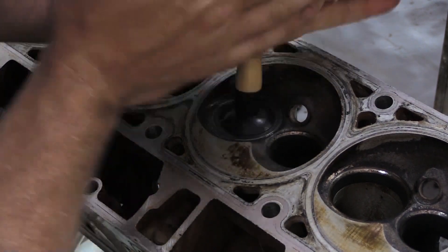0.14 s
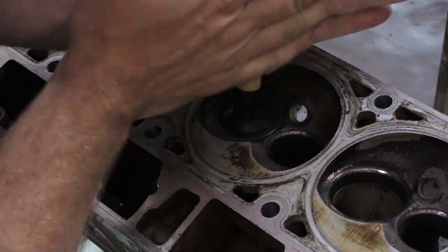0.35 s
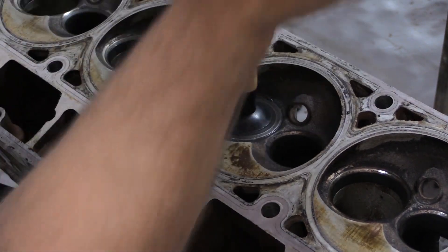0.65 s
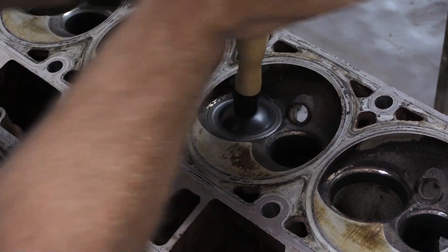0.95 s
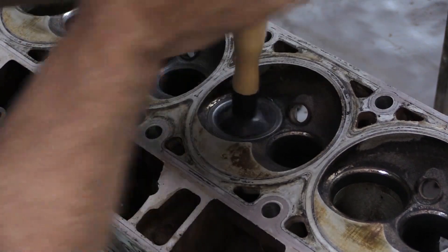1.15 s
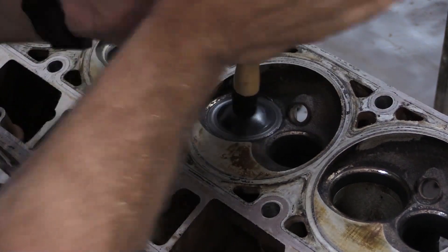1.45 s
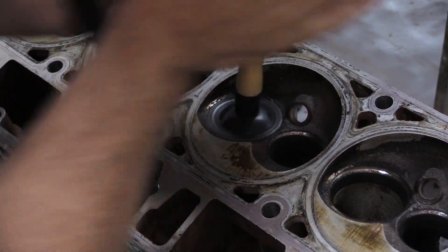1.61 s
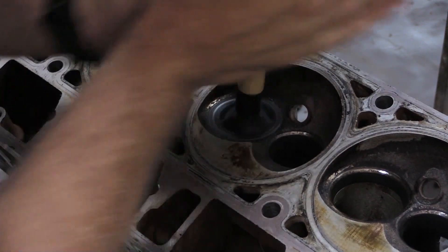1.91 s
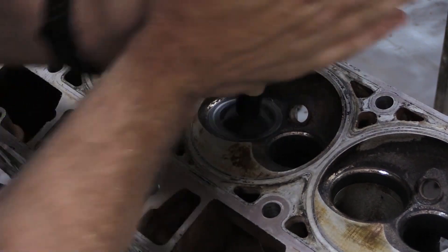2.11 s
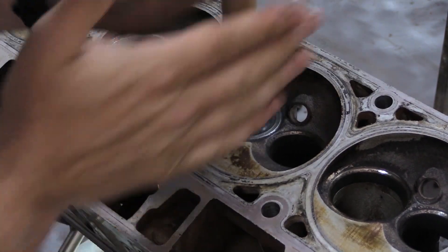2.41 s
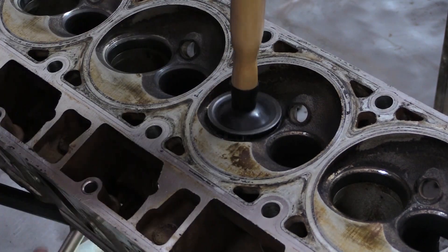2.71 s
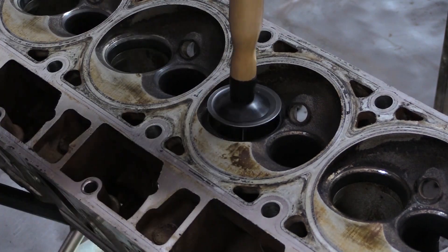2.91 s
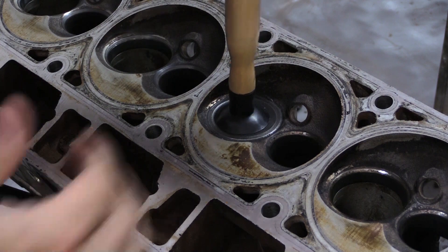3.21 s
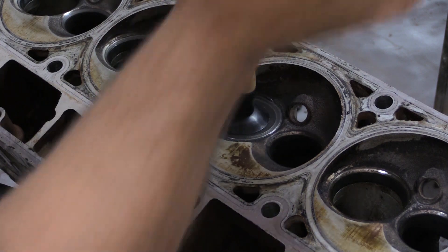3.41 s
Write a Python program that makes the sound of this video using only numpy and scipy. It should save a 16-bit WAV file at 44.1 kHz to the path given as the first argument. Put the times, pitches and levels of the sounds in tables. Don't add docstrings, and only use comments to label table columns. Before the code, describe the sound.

Gritty valve grinding in quick hand-twirled strokes, hissing and ringing with rough judders; a rubber pop near the start and a softer one midway, then a pause and the valve clanks onto its seat. Bare garage, close microphone.

```python
import sys
import numpy as np
from scipy import signal
from scipy.fft import rfft, irfft
from scipy.io import wavfile
from scipy.ndimage import uniform_filter1d

SR = 44100
rng = np.random.default_rng(int(sys.argv[2]) if len(sys.argv) > 2 else 0)


def decibels_to_gain(level_db):
    exponent = np.asarray(level_db, float) / 20
    return 10 ** exponent


def output_pcm(signal):
    pcm = np.clip(np.atleast_2d(signal).T, -1, 1) * 32767
    wavfile.write(sys.argv[1], SR, np.round(pcm).astype(np.int16))


N = 156555
LEAD = SR // 4

# start t/s, length t/s, grit level/dB, rocking re grit level/dB,
# judder re grit level/dB
HALF_TURNS = [(-.17, 0.037, -31, -6, -12), (-.06, 0.13, -28.5, -18, -6), (0.026, 0.32, -34, -17, -7.5),
              (0.16, 0.14, -23.5, 0, 1), (0.258, 0.086, -27, 6.5, 2.5), (0.357, 0.13, -27.5, -4, 5.5),
              (0.452, 0.083, -40.5, 15, -26), (0.845, 0.18, -24, 10.5, 3), (0.99, 0.24, -23.5, 6.5, 0.5),
              (1.109, 0.25, -22.5, -1.5, -2), (1.233, 0.14, -24, -26, -2), (1.345, 0.22, -25.5, -7, -0.5),
              (1.453, 0.14, -25, -17, -6), (1.567, 0.27, -26.5, -18.5, -6), (1.675, 0.037, -29, -26, -6),
              (1.779, 0.16, -30.5, -16.5, -17), (1.877, 0.17, -32, -54, -17), (2.019, 0.18, -26, 6.5, -7),
              (2.093, 0.21, -25, 3, -3), (2.209, 0.17, -27.5, 2, -0.5), (2.326, 0.092, -33.5, 6.5, 8.5)]
# start t/s, length t/s, level/dB
BRUSHES = [
    (0.783, .015, -58.5),
    (0.791, 0.017, -63),
    (2.707, 0.048, -64),
    (2.763, 0.18, -63),
    (3.456, 0.078, -56),
    (3.532, 0.017, -56),
]
# f/Hz, density level/dB
GRIT_SPECTRUM = [(180, -62), (300, -42.5), (1210, -9), (1450, -8), (2090, -18.5), (2550, -21),
                 (3380, -13.5), (10600, -6), (15800, -23)]
# f/Hz, width f/Hz, level/dB
HEAD_MODES = [(1447.2, 17.8, -1.5), (1722, 18, -10.5), (1879, 46, -18.5), (2600.5, 26.5, -10),
              (3029, 5.3, -6.5), (3065, 7.6, -14), (3158, 8.4, -10.5), (4014, 34, -15), (4333, 80, -22.5),
              (5210, 66, -15.5), (5688, 15, -5.5)]
# f/Hz, width f/Hz, level/dB
VALVE_MODES = [(6580, 28, -5), (6800, 34, -1), (7130, 96, -7), (7830, 96, -6), (8660, 34, -3),
               (9140, 32, -2), (9540, 44, 0), (9820, 29, -5), (10200, 23, -4), (10400, 60, -3),
               (11000, 120, -7), (11300, 37, -6), (11600, 140, -7), (12200, 45, -7)]
# f/Hz, width f/Hz, level/dB
CASTING_MODES = [(576, 3, -6), (1456, 1.8, 0), (2585, 4, -7), (3187, 3, -3), (4290, 3, -14)]
# f/Hz, width f/Hz, level/dB
ROCK_MODES = [(576, 24, 0), (630, 50, -9), (710, 60, -13), (530, 50, -14)]
# f/Hz, width f/Hz, level/dB
JUDDER_MODES = [(703, 64, -2), (834, 61, -1), (1070, 330, -4), (1363, 93, -10), (1470, 30, 2.5),
                (1800, 155, -0.5), (1997, 57, -3), (2457, 590, -7)]
# t/s, peak level/dB, f/Hz
POPS = [
    (0.1204, -6, 1800),
    (1.9693, -11, 1960),
]
# multiple of pop f/Hz, level/dB, t60 t/s
CUP_MODES = [(1, 4.5, 0.012), (.7, -18, 0.026), (1.45, -9.5, 0.017)]
# t/s, level/dB, brightness level/dB
TAPS = [
    (.805, -30, -26.5),
    (.841, -18.5, -27),
    (1.0, -28, -13),
    (2.711, -45, -27),
    (3.1105, -11, -12.5),
]
# f/Hz, level/dB, t60 t/s
SEAT_MODES = [(576, 0, .3), (603, -9, .3), (1448, -15, .25), (1712, -12, .2), (2589, -12, .3),
              (3042, -12, .3), (4250, -14, .2), (5690, -1, .17), (6800, -14, .07), (7138, -19, .2),
              (9534, -8, .2), (9787, -14, .2), (10800, -10, .17), (12200, -13, .12)]
# f/Hz, density level/dB
CRACK_SPECTRUM = [(400, -32.5), (900, 5), (2200, -5.5), (4500, 0.5), (7500, -13.5), (11000, 1),
                  (15000, -20)]
# t/s, level/dB, f/Hz
THUDS = [
    (0.572, -49, 90),
    (2.479, -40.5, 106),
    (2.629, -38.5, 50.9),
    (3.114, -38.5, 71.5),
]
# f/Hz, t60 t/s
ROOM_T60 = [(100, 1), (600, 0.89), (1500, 1.0), (4000, 1), (9000, 0.66), (15000, 0.22)]
# f/Hz, level/dB
ROOM_COLOUR = [(300, 0), (1500, -2.5), (4000, 1), (8000, -8.5), (14000, 13)]
# f/Hz, density level/dB
AIR_SPECTRUM = [(12, -38), (20, -8), (233, -5), (819, -17), (1430, -11), (1560, -19), (15800, -27)]

SPEED_SKEW, SPEED_POWER = 0.85, 0.75
JUDDER_SKEW, JUDDER_POWER = 0.42, 0.69
TREBLE_POWER, TREBLE_HZ = 1.9, 10500
GRIT_PER_S, GRIT_SPREAD_DB, HISS_DB = 9000, 4.5, 3
SLIPS_PER_S, SLIP_SPREAD_DB = 900, 4
CLUMP_DB, CLUMPS_PER_S = 4, 45
HEAD_DB, VALVE_DB, CASTING_DB, JUDDER_DB = 2.5, -3, -15, -1
CATCH_PER_S = 18
HEAD_CATCH_DB, VALVE_CATCH_DB, JUDDER_CATCH_DB = 4, 3, 5
RUMBLE_DB, RUMBLE_HZ, LUMPS_DB = -51.5, 140.4, 3
THUD_T60_S = 0.36
CHATTER_S, CHATTER_LOSS_DB, CHATTER_SHARE = 0.005, 2, 0.3
CRACK_DB, CRACK_T60_S = 0.5, 0.32
METAL_LOW_HZ = 458
ROOM_DB, ROOM_DELAY_S = -6, 0.0083
AIR_DB, WHINE_DB, WHINE_HZ = -58, -73, 12500
MIC_TOP_HZ = 16700


def rms_one(x):
    return x / np.sqrt(np.mean(x ** 2) + 1e-20)


def clock():
    return (np.arange(N + LEAD) - LEAD) / SR


def at_hz(points, hz):
    p = np.array(points)
    return np.interp(np.log(np.maximum(hz, 1)), np.log(p[:, 0]), p[:, 1])


def colour(x, spectrum):
    hz = np.arange(len(x) // 2 + 1) * SR / len(x)
    return rms_one(irfft(rfft(x) * decibels_to_gain(at_hz(spectrum, hz)), len(x)))


def lowpass(x, order, hz):
    return signal.sosfilt(signal.butter(order, hz, fs=SR, output="sos"), x)


def drift(rate):
    knots = np.clip(rng.standard_normal(400), -2, 2)
    return np.interp((clock() + 1) * rate, np.arange(400), knots)


def resonance(x, hz, width):
    r = np.exp(-np.pi * width / SR)
    b = (1 - r * r) / 2 * np.array([1, 0, -1])
    a = [1, -2 * r * np.cos(2 * np.pi * hz / SR), r * r]
    return signal.lfilter(b, a, x + 1e-18)


def ring(times, gains, hz, t60):
    blows = np.full(N + LEAD, 1e-18)
    blows[(np.asarray(times) * SR).astype(int) + LEAD] = gains
    r = decibels_to_gain(-60 / (t60 * SR))
    w = 2 * np.pi * hz / SR
    return signal.lfilter([0, np.sin(w)], [1, -2 * r * np.cos(w), r * r], blows)


def grains(per_s, spread_db):
    n = N + LEAD
    size = decibels_to_gain(spread_db * np.minimum(rng.exponential(1, n), 3))
    sign = rng.choice([-1, 1], n)
    return rms_one(size * sign * (rng.random(n) < per_s / SR))


def turning(starts, lengths, dbs, power, skew=SPEED_SKEW):
    t = clock()
    gain = np.zeros(len(t))
    for start, length, db in zip(starts, lengths, dbs):
        phase = np.clip((t - start) / length, 0, 1) ** skew
        inside = (t > start) * (t < start + length)
        gain += decibels_to_gain(db) * np.sin(np.pi * phase) ** power * inside
    return gain


def body(drive, modes, catch_db):
    norm = np.sqrt(sum(decibels_to_gain(2 * db) * width for _, width, db in modes) * np.pi / SR)
    out = 0
    for k, (hz, width, db) in enumerate(modes):
        caught = drive * decibels_to_gain(catch_db * drift(CATCH_PER_S))
        out = out + (-1) ** k * decibels_to_gain(db) * resonance(caught, hz, width)
    return out / norm


def grinding():
    start, length, db, rock_db, judder_db = np.transpose(HALF_TURNS)
    gap = np.diff(start, append=9)
    length = np.where(gap < 0.2, gap, length)
    brush = turning(*np.transpose(BRUSHES), SPEED_POWER)
    speed = turning(start, length, db, SPEED_POWER) + brush
    treble_speed = turning(start, length, db, TREBLE_POWER) + brush
    rocking = turning(start, length, db + rock_db, JUDDER_POWER, JUDDER_SKEW)
    juddering = turning(start, length, db + judder_db, JUDDER_POWER, JUDDER_SKEW)

    grit = grains(GRIT_PER_S, GRIT_SPREAD_DB)
    slips = grains(SLIPS_PER_S, SLIP_SPREAD_DB) * decibels_to_gain(CLUMP_DB * drift(CLUMPS_PER_S))
    hiss = decibels_to_gain(HISS_DB) * colour(grit, GRIT_SPECTRUM)
    dull = lowpass(hiss, 1, TREBLE_HZ)

    out = dull * speed + (hiss - dull) * treble_speed
    out += decibels_to_gain(CASTING_DB) * body(grit * speed, CASTING_MODES, 0)
    out += decibels_to_gain(HEAD_DB) * body(grit * speed, HEAD_MODES, HEAD_CATCH_DB)
    out += decibels_to_gain(VALVE_DB) * body(grit * speed, VALVE_MODES, VALVE_CATCH_DB)
    out += body((grit + slips / 2) * rocking, ROCK_MODES, 0)
    out += decibels_to_gain(JUDDER_DB) * body(slips * juddering, JUDDER_MODES, JUDDER_CATCH_DB)
    return out


def bench():
    start, length, *_ = np.transpose(HALF_TURNS)
    starts, lengths = [*start, 0.5, 2.4, 3.1], [*length, 0.35, 0.35, 0.6]
    busy = uniform_filter1d(turning(starts, lengths, np.zeros(len(starts)), 0.17), size=5000)
    rumble = rms_one(lowpass(rng.standard_normal(N + LEAD), 2, RUMBLE_HZ))
    thuds = sum(ring([t], decibels_to_gain(db), hz, THUD_T60_S) for t, db, hz in THUDS)
    return decibels_to_gain(RUMBLE_DB + LUMPS_DB * drift(9.4)) * busy * rumble + lowpass(thuds, 2, 220)


def garage_air():
    air = colour(rng.standard_normal(N + LEAD), AIR_SPECTRUM)
    whine = rms_one(resonance(rng.standard_normal(N + LEAD), WHINE_HZ, 30))
    return decibels_to_gain(AIR_DB) * air + decibels_to_gain(WHINE_DB) * whine


def cup_pops():
    return sum(ring([t], decibels_to_gain(db + mode_db), hz * multiple, t60)
               for t, db, hz in POPS for multiple, mode_db, t60 in CUP_MODES)


def seat_taps():
    t, db, bright = np.repeat(np.transpose(TAPS), 6, axis=1)
    k = np.arange(len(t)) % 6
    t = t + CHATTER_S * k * rng.uniform(0.8, 1.2, len(t))
    db = db - 1 - CHATTER_LOSS_DB * k
    out = 0
    for hz, mode_db, t60 in SEAT_MODES:
        dulling = (bright - bright.max()) * (hz > 2000)
        share = np.where(k, rng.normal(0, CHATTER_SHARE, len(t)), 1)
        out = out + ring(t, decibels_to_gain(db + mode_db + dulling) * share, hz, t60)

    now = clock()
    crack = np.zeros(len(now))
    for hit, hit_db, bright_db in TAPS:
        fall_db = 60 * np.abs(now - hit) / CRACK_T60_S
        crack += decibels_to_gain(hit_db + bright_db + CRACK_DB - fall_db) * (now > hit)
    return out + crack * colour(rng.standard_normal(len(now)), CRACK_SPECTRUM)


def garage(x):
    t = np.arange(SR) / SR
    edges = 100 * 2 ** np.arange(0, 7.6, 0.5)
    onset = np.clip(t / ROOM_DELAY_S - 0.5, 0, 1)
    tail = 0
    for low, high in zip(edges, edges[1:]):
        half_octave = signal.butter(2, [low, high], "band", fs=SR, output="sos")
        band = signal.sosfilt(half_octave, rng.standard_normal(SR))
        fall = decibels_to_gain(-60 * t / at_hz(ROOM_T60, np.sqrt(low * high)))
        tail = tail + decibels_to_gain(at_hz(ROOM_COLOUR, low)) * band * fall * onset
    return signal.fftconvolve(x, tail / np.sqrt(SR * 0.07))[:len(x)]


def scene():
    highpass = signal.butter(4, METAL_LOW_HZ, "high", fs=SR, output="sos")
    close = signal.sosfilt(highpass, grinding() + cup_pops() + seat_taps())
    mix = close + decibels_to_gain(ROOM_DB) * garage(close) + bench() + garage_air()
    return mix[None, LEAD:]


def band_limit(x):
    return signal.sosfilt(signal.butter(12, 16260, fs=SR, output="sos"), x)


def record(dry):
    top_cut = signal.cheby2(10, 60, MIC_TOP_HZ, fs=SR, output="sos")
    mix = signal.sosfilt(top_cut, dry)
    return band_limit(mix)


dry = scene()
out = record(dry)
output_pcm(out)
```